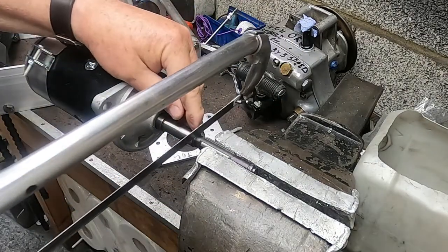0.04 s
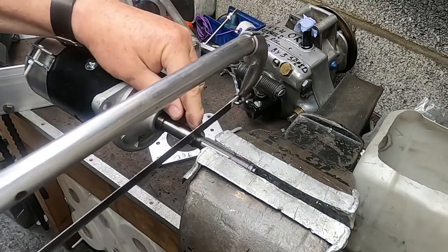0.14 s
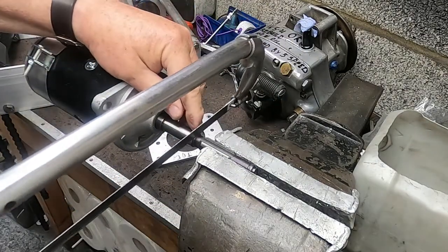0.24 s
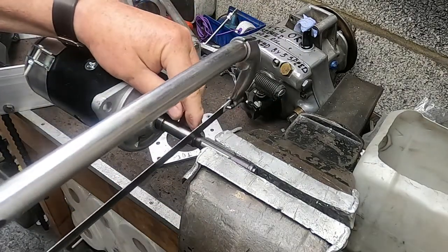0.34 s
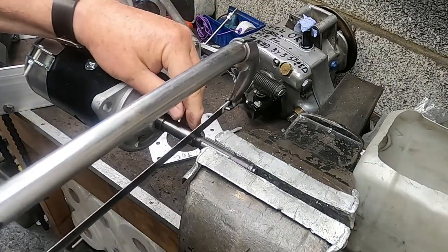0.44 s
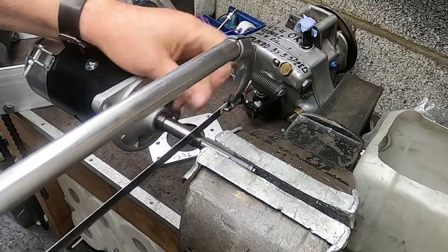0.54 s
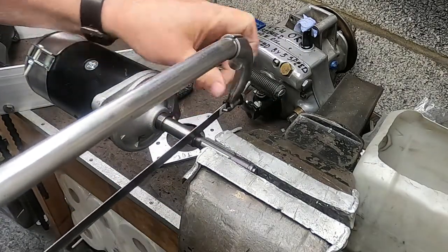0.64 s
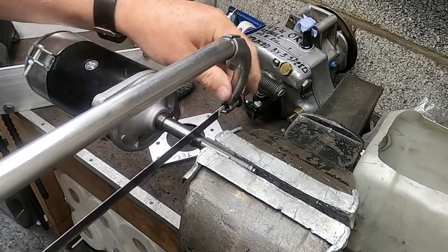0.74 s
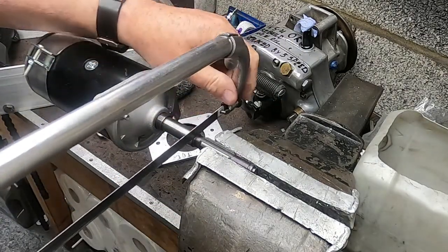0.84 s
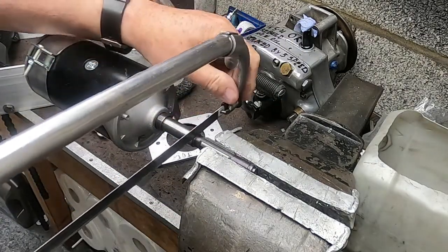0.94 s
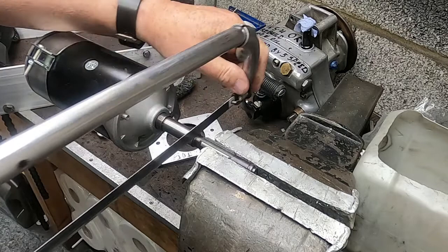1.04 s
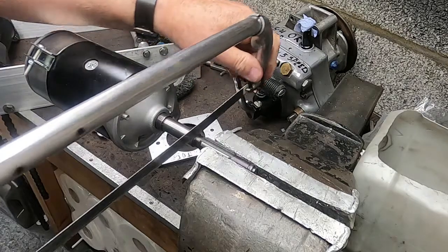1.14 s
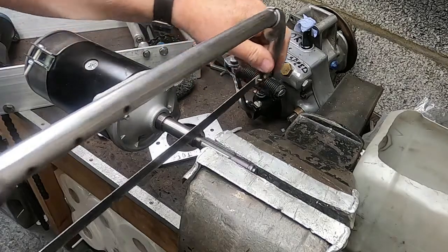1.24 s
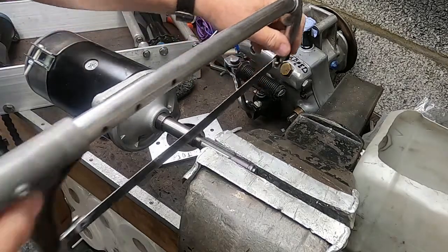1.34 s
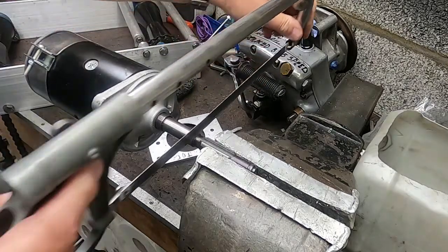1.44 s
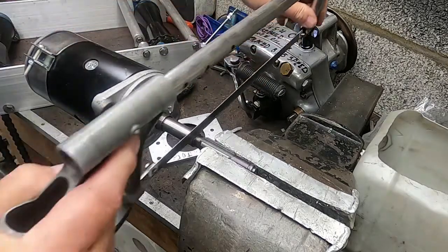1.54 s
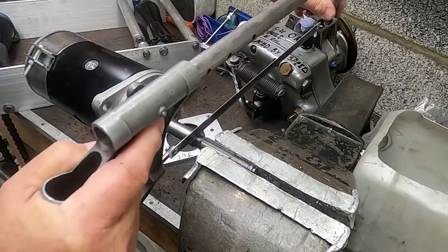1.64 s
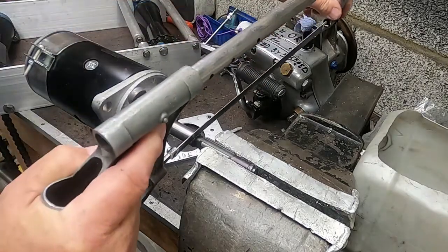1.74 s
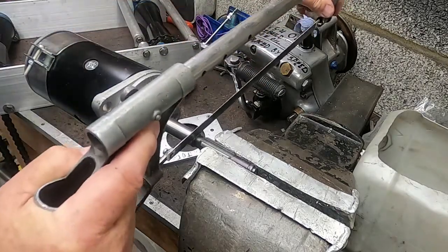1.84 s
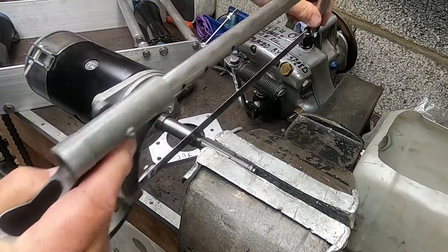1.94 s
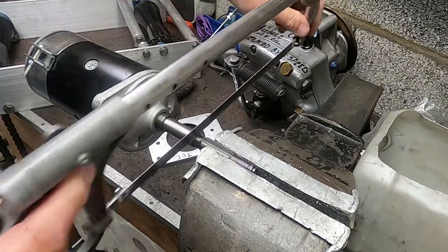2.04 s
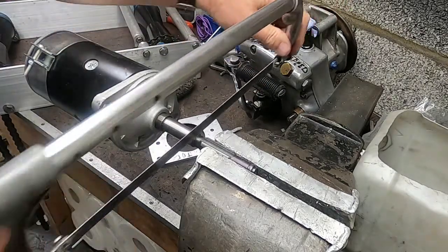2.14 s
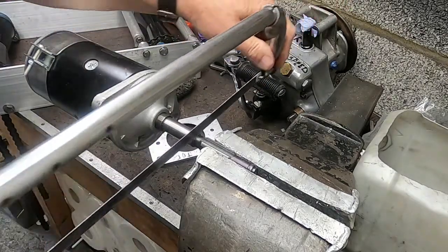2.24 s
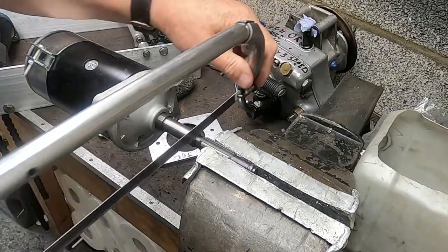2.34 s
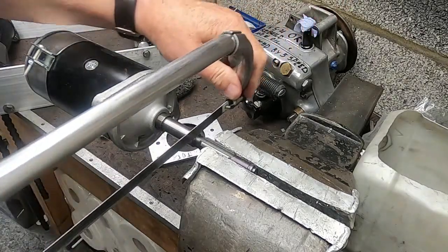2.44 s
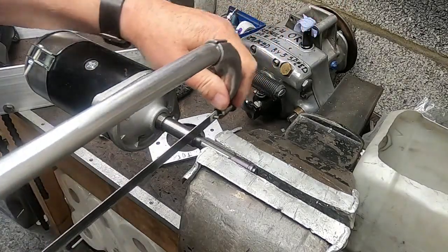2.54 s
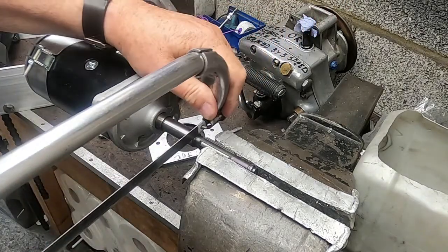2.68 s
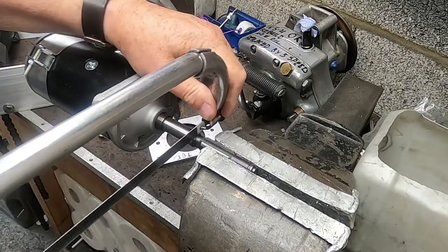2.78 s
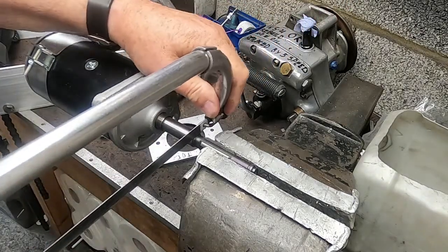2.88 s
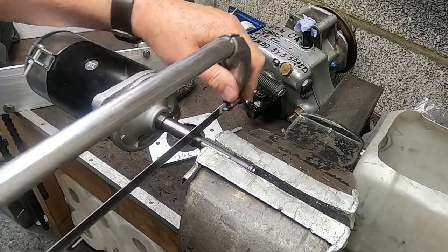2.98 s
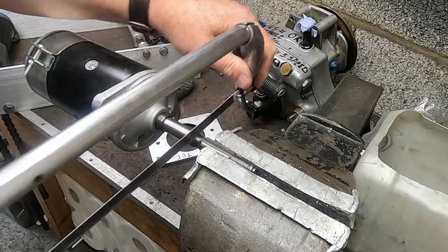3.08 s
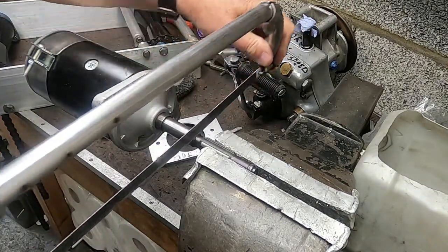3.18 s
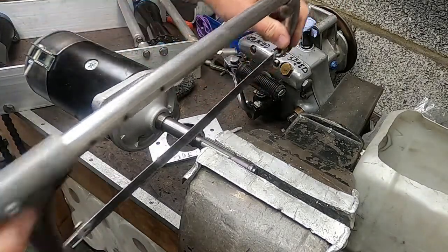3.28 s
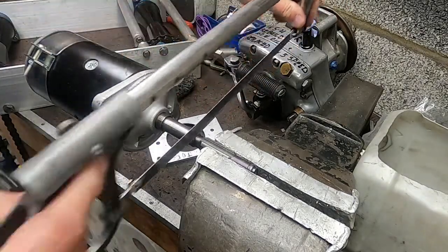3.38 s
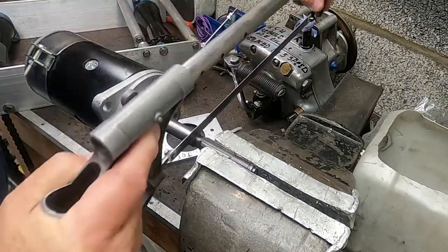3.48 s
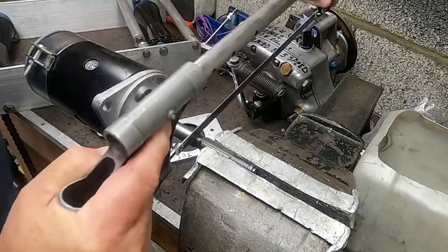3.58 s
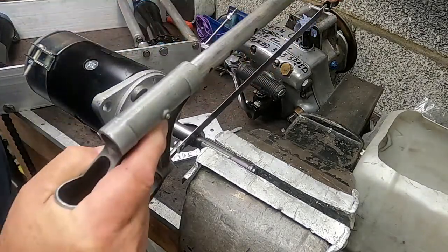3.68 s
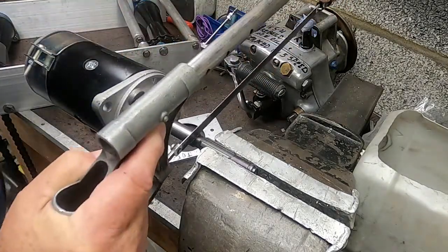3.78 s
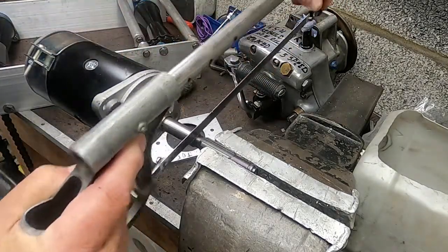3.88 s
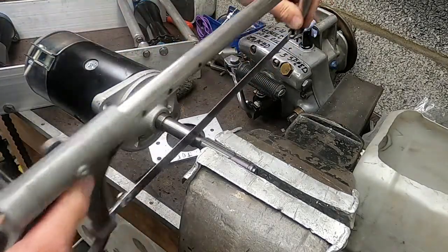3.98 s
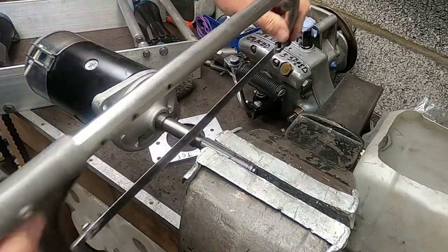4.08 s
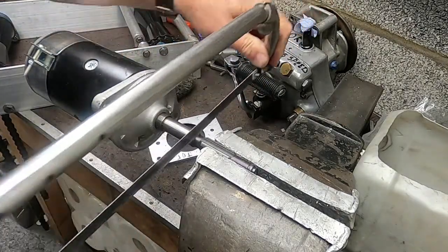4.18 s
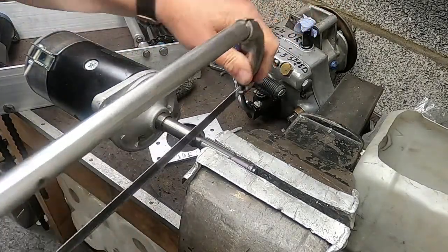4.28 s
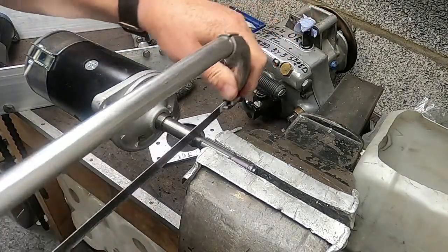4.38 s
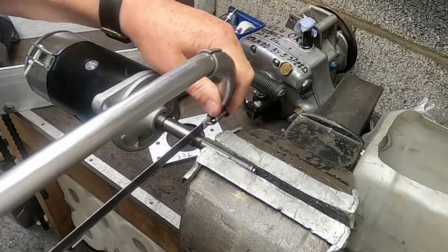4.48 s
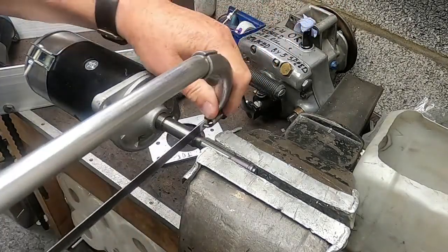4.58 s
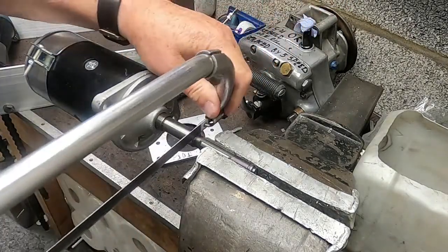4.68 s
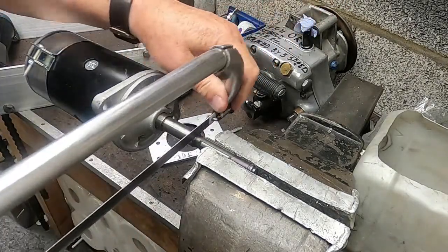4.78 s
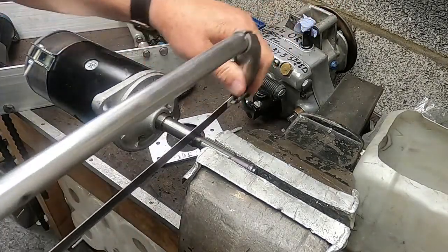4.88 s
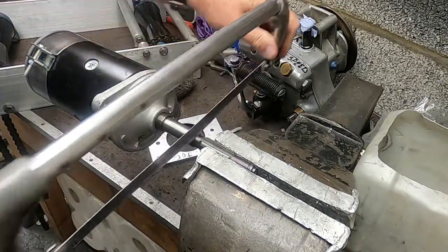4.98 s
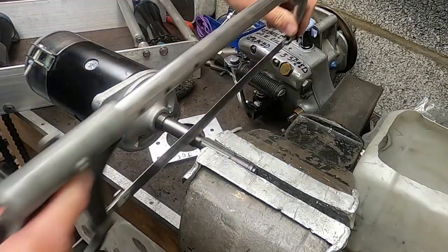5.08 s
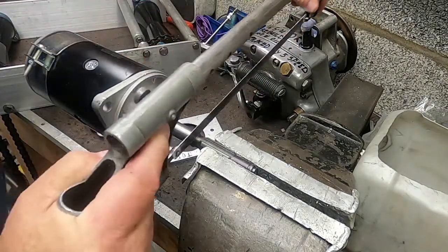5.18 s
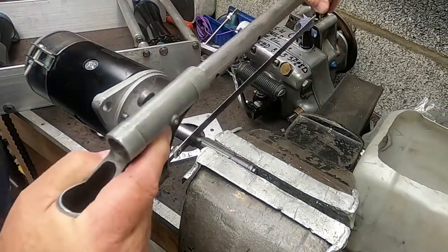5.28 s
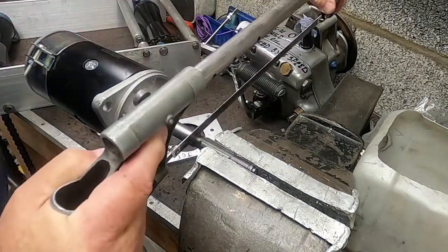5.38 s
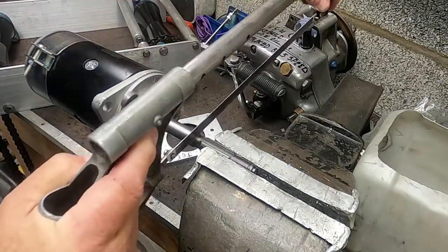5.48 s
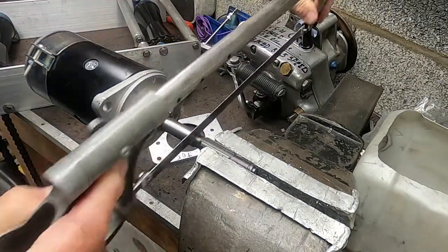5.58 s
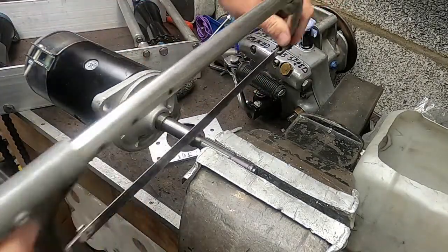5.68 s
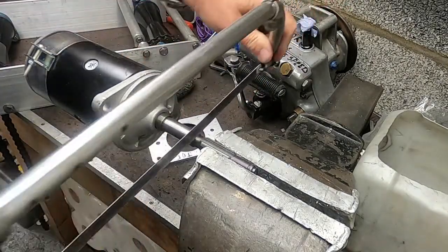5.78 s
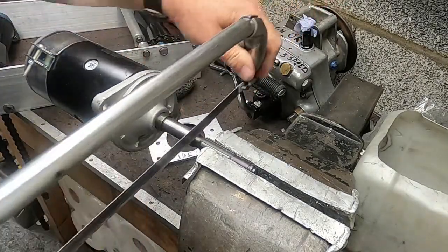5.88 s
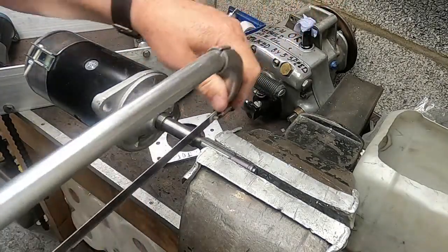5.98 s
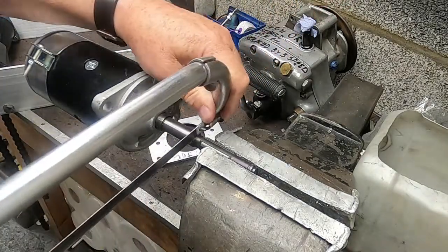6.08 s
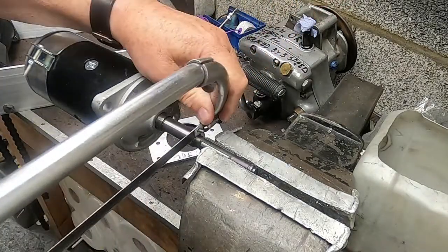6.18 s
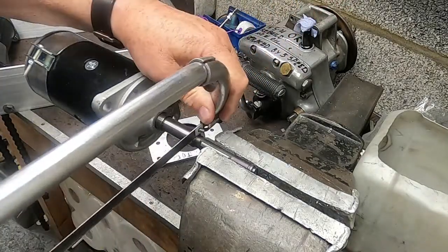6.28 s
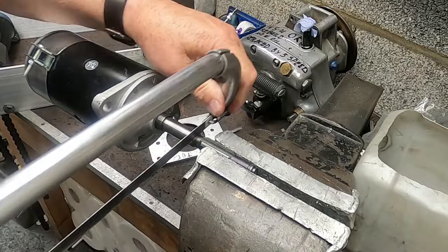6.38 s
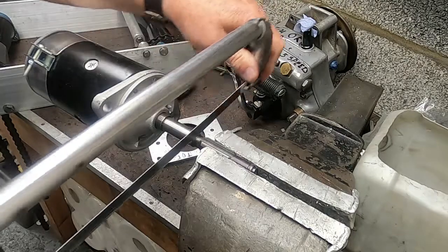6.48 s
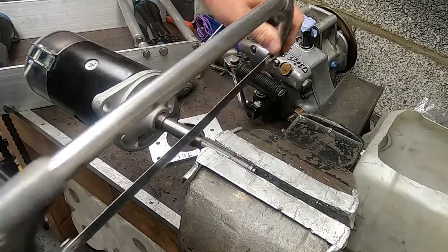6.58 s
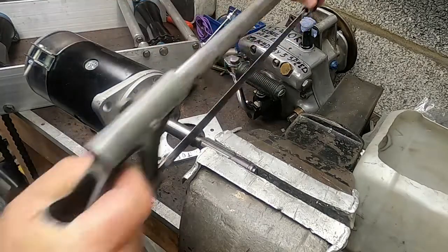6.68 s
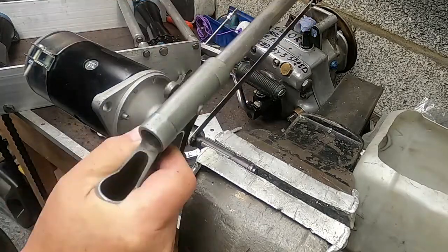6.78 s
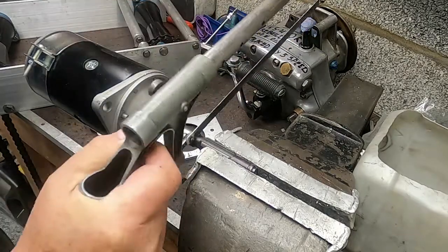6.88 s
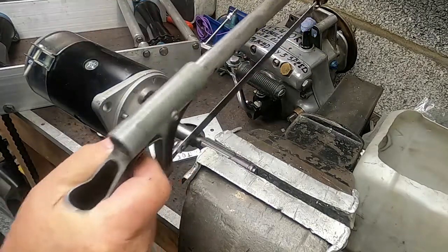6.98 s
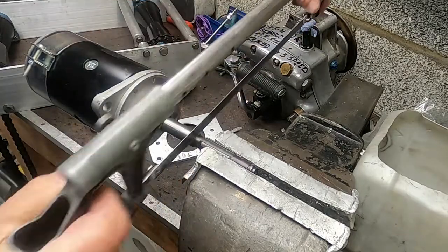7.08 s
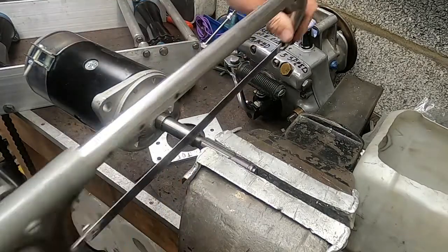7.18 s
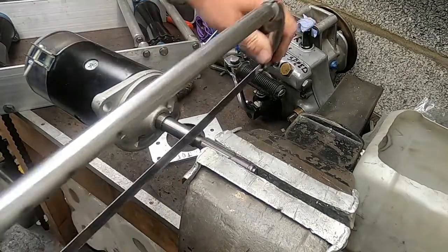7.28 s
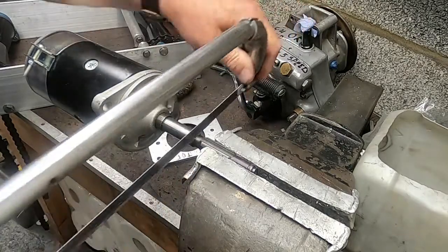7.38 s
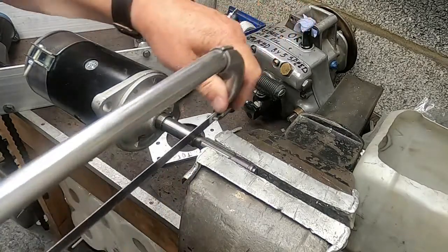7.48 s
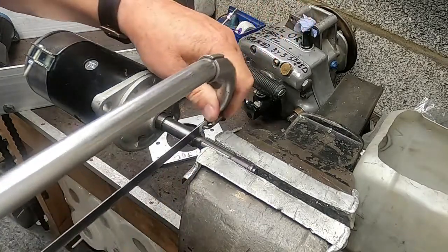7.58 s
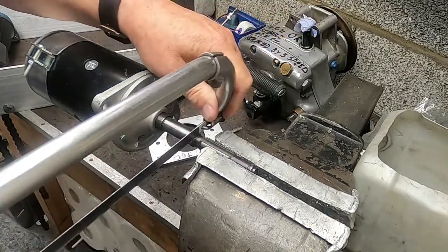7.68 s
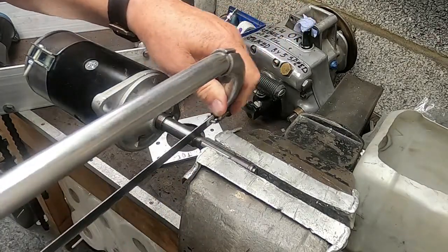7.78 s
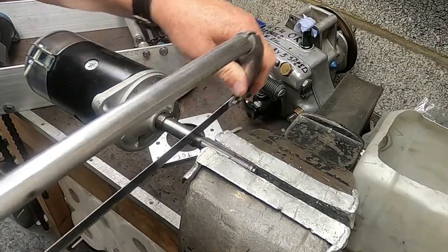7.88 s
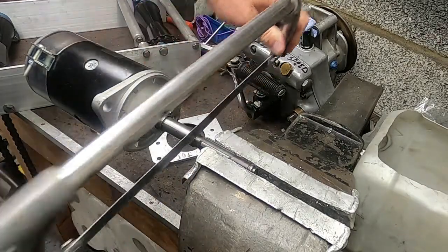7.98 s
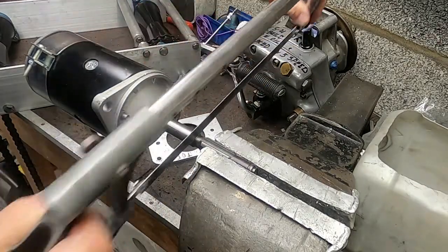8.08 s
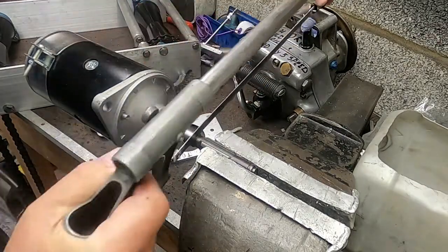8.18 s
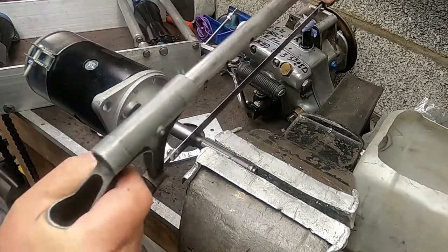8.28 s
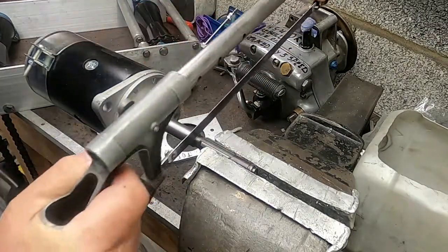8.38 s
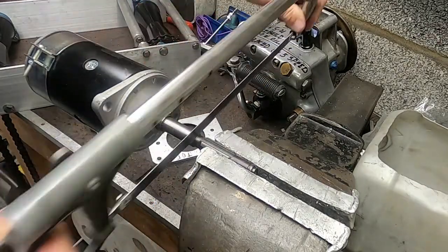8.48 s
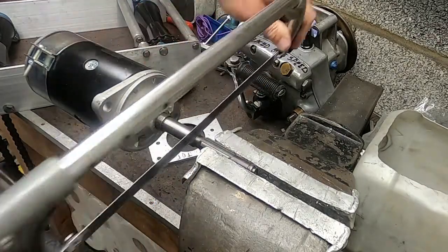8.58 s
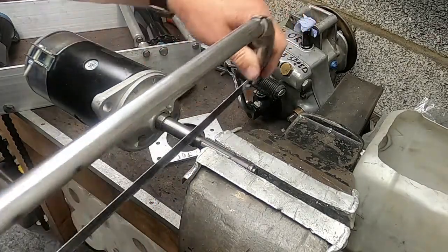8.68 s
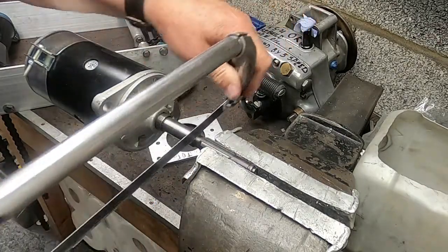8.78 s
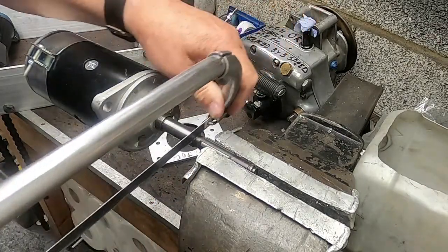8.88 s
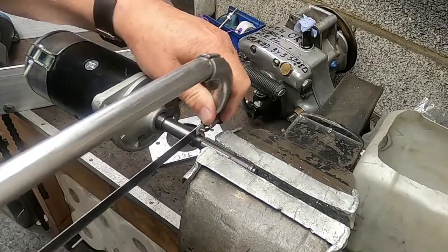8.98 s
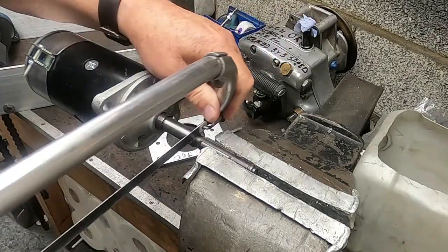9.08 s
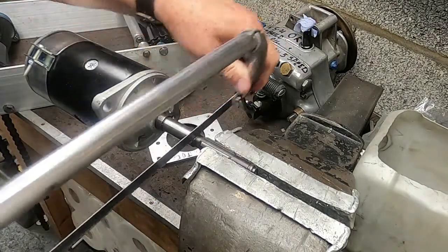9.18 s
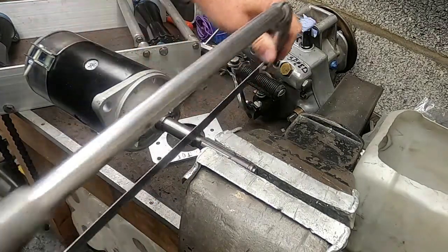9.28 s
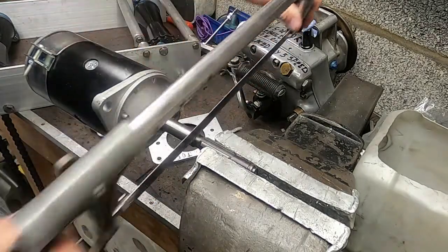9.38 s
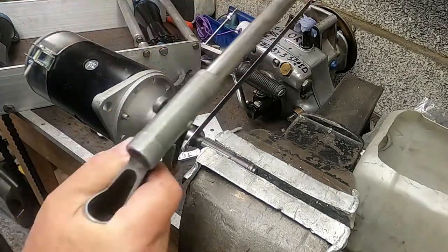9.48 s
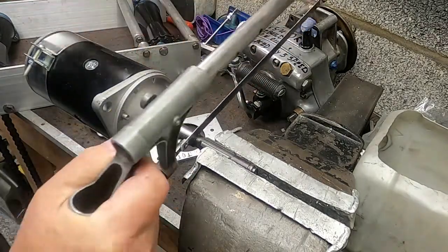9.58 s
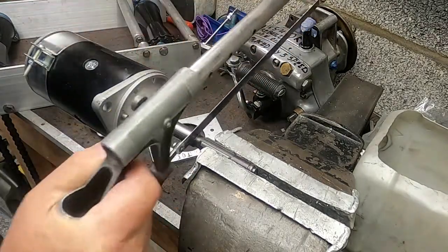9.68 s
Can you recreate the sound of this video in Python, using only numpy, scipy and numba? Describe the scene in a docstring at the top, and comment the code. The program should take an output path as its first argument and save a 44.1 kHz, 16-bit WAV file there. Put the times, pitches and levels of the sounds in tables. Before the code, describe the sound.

Close by in a small workshop, faint metal ticks lead into steady hand sawing through a clamped steel shaft. Each push and pull of the hacksaw makes a gritty, hissing rasp with a metallic ring, over a low grind and the rumble of the workbench. The strokes grow faster and somewhat louder, and the blade increasingly chatters and squeaks, with small crunches and an occasional dull knock as it turns.

```python
"""First come light scuffs and ticks: a hacksaw is set on a steel shaft in a bench vise, close by.
Then eleven rasping strokes cut into it. Teeth and tearing chips make the saw frame and shaft ring.
The free lengths of blade on either side of the cut ring too, one gliding up as the other glides down.
Now and then the blade chatters, sticks and shrieks, or a tooth snags with a crunch.
The bench shudders underneath, and the small workshop adds a short echo."""
import sys
import numpy as np
from scipy import signal
from scipy.fft import rfft, irfft, next_fast_len
from scipy.io import wavfile
from scipy.ndimage import uniform_filter1d, map_coordinates
from numba import njit

SR = 44100
rng = np.random.default_rng(int(sys.argv[2]) if len(sys.argv) > 2 else 0)


def generate_wav(signal):
    """Clip the signal to [-1, 1] and save it as 16-bit WAV at the path in sys.argv[1]."""
    frames = np.transpose(np.atleast_2d(signal))
    scaled = np.clip(frames, -1, 1) * 32767
    pcm = np.round(scaled).astype(np.int16)
    wavfile.write(sys.argv[1], SR, pcm)


N = 429534

# Table levels are relative: each sound sets its own overall gain. A fade is the time to drop 60 dB.
# A resonance is a pitch at which a thing likes to ring; the smaller its width, the longer it rings.
# The blade scuffs the shaft as it is placed or comes to rest: middle_s, length_s, level_db
SCUFFS = [(0.003, .1, -43), (0.143, 0.65, -58), (0.303, 0.14, -58.5), (0.614, 0.081, -64),
          (0.796, 0.071, -66), (3.664, 0.057, -45.5)]
# Single teeth tick on the shaft: start_s, level_db
TICKS = [(.024, -41), (.14, -44.5), (.256, -46), (.288, -48), (.309, -41), (.338, -54), (.4, -55)]
# Resonances of the saw frame under a light touch: pitch_hz, width_hz, level_db
LIGHT_RING = [(762, 26, -5), (1856, 38, 2.5), (2040, 58, 4), (2900, 74, -5.5), (3420, 120, -1),
              (4110, 33, -14), (4300, 45, -4)]
# Tone colour of the rasp: pitch_hz, level_db
RASP_COLOUR = [(500, -8.5), (800, -4.5), (1050, 1), (1600, -1), (2400, 2), (3400, 3), (4800, 3.5),
               (5600, 0.5), (6300, 5.5), (6800, -5.5), (8000, -6.5), (10000, -10.5), (12000, -16),
               (14200, -19.5), (15000, -53.5)]
# Resonances of the saw frame while cutting: pitch_hz, width_hz, level_db
FRAME_RING = [(756, 23, -7.5), (1160, 56, 1.5), (1298, 61, -8), (1416, 75, -4), (2416, 40, -3),
              (2823, 28, 1.5), (3064, 65, -4), (3140, 64, -3), (3274, 80, -7), (3460, 70, -6.5),
              (3938, 35, -3), (4570, 90, -4), (5450, 98, 0)]
# The frame's singing resonance, which shifts with the grip: pitch_hz, width_hz, level_db
FRAME_SINGING = [(1997, 45, 0)]
# Tone colour of the low grind: pitch_hz, level_db
GRIND_COLOUR = [(100, -22), (200, -2.5), (400, 15), (540, -11.5), (720, -1.5), (1300, 10.5), (2000, -2),
                (4000, -58)]
# Resonances of the vise: pitch_hz, width_hz, level_db
VISE_RING = [(206.3, 15, 1), (252.7, 11.6, -2.5), (312, 13.3, -4.5), (424.5, 20.5, -2), (651, 18, -18)]
# Resonances of the slack blade flapping sideways: pitch_hz, width_hz, level_db
BLADE_FLAP = [(266, 14, -9.5), (360, 90, -14.5), (436, 48, -5)]
# The bench's deep sway: time_s, pitch_hz
SWAY_PITCH = [(0, 37.5), (1.05, 39.13), (1.2, 46.44), (6.2, 46.46), (7, 48.78), (9.74, 47.9)]
# Resonances of the bench top: pitch_hz, width_hz, level_db
BENCH_TOP_RING = [(69.1, 6.1, 3.5), (107.3, 16, -1.5), (137.1, 13.7, 2)]
# Tone colour of the still air: pitch_hz, level_db
AIR_COLOUR = [(25, -8.5), (60, 11.5), (150, -22.5), (300, -18.5), (700, -32.5), (2000, -36.5),
              (6000, -36.5), (14000, -52.5)]
# Pushes and pulls in turn, a push first. The saw is half way at halfway_share of the stroke's time;
# bite is how hard the teeth cut, and resting is the blade's drag in the cut afterwards:
# start_s, length_s, halfway_share, rise_s, fall_s, bite_db, thrum_db, sway_db, resting_db
STROKES = [(1.029, .78, 0.44, 0.15, 0.19, -32, -36.5, -32, -77),
           (1.915, 0.94, 0.46, 0.078, 0.46, -29.5, -37, -39.5, -74),
           (2.888, 0.85, .45, 0.24, 0.28, -28, -34.5, -24.5, -75),
           (3.82, 0.88, 0.53, 0.22, 0.4, -26.5, -32.5, -35, -72.5),
           (4.763, 0.59, 0.43, 0.23, 0.2, -23, -32, -27.5, -64.5),
           (5.539, .70, .5, 0.11, 0.25, -25, -34, -31.5, -73),
           (6.35, 0.57, 0.43, 0.2, 0.17, -23, -33.5, -33, -73.5),
           (6.996, 0.744, 0.5, 0.19, 0.28, -25, -33, -35.5, -62),
           (7.787, 0.52, .43, 0.16, 0.16, -23, -30.5, -35.5, -62),
           (8.426, 0.66, 0.47, 0.11, 0.27, -22.5, -37, -36, -82),
           (9.099, .53, 0.42, 0.15, 0.16, -22, -28.5, -24.5, -64),
           (9.699, 0.5, 0.45, 0.13, .25, -24, -22, -35, -72)]
# Resonances of the shaft: pitch_hz, width_hz, level_db
SHAFT_RING = [(4097, 34, -1), (4342, 28, 1)]
# Bending resonances of the longest free length of blade: pitch_hz, width_hz, level_db
BLADE_RING = [(202.2, 36, -3), (431, 60, 5.5), (680, 270, -12), (1248, 130, 3), (2466, 150, -1.5),
              (4120, 180, -4)]
# How well the frame passes on the blade's ring: pitch_hz, level_db
BLADE_CARRY = [(250, -1), (430, -1), (540, -5), (680, 3), (930, 2), (1100, 0), (1400, 1), (2000, -4),
               (2800, 0), (4200, -5), (6000, -8), (7500, -30)]
# Resonances of the blade as it twists and chatters: pitch_hz, width_hz, level_db
CHATTER_RING = [(5440, 290, 3.5), (5860, 180, 1), (6028, 88, 15)]
# The arm leans in during the first, slow strokes: middle_s, length_s, boost_db
SURGES = [(1.4, 0.44, 4), (2.21, 0.44, 3), (3.37, 0.24, 4)]
# Resonances of the blade's side scraping the cut: pitch_hz, width_hz, level_db
SCRAPE_RING = [(5400, 350, 0), (5700, 390, 0)]
# The blade sticks and shrieks on one resonance: middle_s, length_s, pitch_hz, level_db
SHRIEKS = [(1.528, 0.32, 4320, -39), (1.684, 0.074, 2950, -43), (2.276, 0.058, 1994, -31),
           (2.465, 0.12, 1886, -36), (3.044, 0.033, 6470, -35), (3.57, 0.15, 4340, -38),
           (4.262, 0.061, 6220, -28), (5.039, .045, 4100, -27), (6.507, 0.049, 4090, -25),
           (6.552, 0.045, 4140, -28), (6.685, 0.032, 1963, -30), (6.696, 0.03, 5870, -23),
           (6.838, 0.11, 410, -38.5), (7.191, 0.065, 5280, -26), (7.271, 0.084, 6050, -24),
           (7.357, 0.054, 6300, -29), (7.448, 0.035, 1960, -26), (7.493, 0.038, 2067, -27),
           (7.911, 0.048, 6280, -32), (7.929, 0.029, 4110, -21), (7.98, 0.057, 5980, -29),
           (8.08, 0.045, 6150, -30), (8.127, 0.051, 5970, -26), (8.608, 0.075, 6130, -26),
           (8.81, 0.05, 2020, -27), (9.412, 0.04, 6000, -21.5), (9.444, 0.041, 5225, -26.5),
           (9.5, 0.048, 6150, -27.5)]
# A tooth snags and breaks free: start_s, level_db
SNAGS = [(1.4163, -10), (1.5345, -12), (2.2004, -14), (2.2603, -17), (2.4233, -16.5), (2.4798, -23),
         (3.0465, -18.5), (3.3372, -10), (3.381, -15), (4.135, -13), (5.0325, -13), (5.7796, -10.5),
         (5.9948, -12.5), (6.0242, -11), (6.555, -15), (6.5859, -13.5), (6.6073, -15), (6.651, -12),
         (7.5234, -17), (7.9244, -13.5), (8.0247, -20), (8.0691, -11.5), (9.4025, -18), (9.4424, -14)]
# The saw knocks as it turns round: start_s, level_db
KNOCKS = [(1.789, -27), (5.317, -32.5), (5.489, -39.5)]
# Tone colour of a knock: pitch_hz, level_db
KNOCK_COLOUR = [(60, 4), (150, 22), (500, 10), (1000, 7), (2200, 2.5), (2900, -13), (8000, -20.5),
                (14000, -44.5)]
# The teeth drop into the cut and bite at once: start_s, level_db
CATCHES = [(1.9525, -29.5), (3.837, -43), (4.783, -44), (5.5445, -32), (6.375, -43), (6.9955, -43),
           (7.047, -31), (7.802, -44), (8.431, -33), (9.111, -41), (9.127, -35), (9.723, -33)]
# Stereo width, as the side signal's level against the middle: pitch_hz, level_db
STEREO_WIDTH = [(40, -28), (125, -26), (350, -20), (1200, -13), (3000, -7.5), (6000, -5), (9000, 1)]
# How long the workshop echoes: pitch_hz, fade_s
ROOM_FADE = [(100, 0.06), (500, 0.26), (1400, 0.34), (2300, 0.22), (3200, 0.17), (10000, 0.099)]

TIME_S = np.arange(N) / SR


def amp(db):
    """Turn decibels into a gain."""
    return 10 ** (np.asarray(db) / 20)


def unit(x):
    """Scale to an average (rms) level of 1."""
    return x / np.sqrt(np.mean(x ** 2) + 1e-20)


def along(points, hz):
    """Read between the rows of a (pitch_hz, value) table, on a log pitch scale."""
    pitches, values = np.transpose(points)
    return np.interp(np.log(hz + 1), np.log(pitches + 1), values)


def ease(x):
    """Rise from 0 to 1 along a quarter sine."""
    return np.sin(np.pi / 2 * np.clip(x, 0, 1))


def arch(x, middle, width):
    """A smooth hump of height 1."""
    return ease(1 - 2 * np.abs(x - middle) / width)


def wobble(rate):
    """A smooth curve through `rate` random values a second."""
    return map_coordinates(rng.standard_normal(int(N * rate / SR) + 4), [TIME_S * rate])


def flares(depth_db=2.8, rate=30):
    """A gain that flares and fades at random."""
    return unit(amp(depth_db * wobble(rate)))


def bursts(rows, fade_s):
    """A short, fading burst of noise for each (start_s, level_db) row."""
    force, t = np.zeros(N + SR), np.arange(SR // 20) / SR
    for start_s, db in rows:
        force[round(start_s * SR):][:len(t)] += amp(db - 60 * t / fade_s) * rng.standard_normal(len(t))
    return force[:N]


def filtered(x, response):
    """Multiply each frequency in x by response(hz)."""
    size = next_fast_len(N + SR // 2, True)
    return irfft(rfft(x, size) * response(np.fft.rfftfreq(size, 1 / SR)), size)[..., :N]


def through(x, pulse):
    """Let every sample of x set off a pulse, scaled to an energy of 1."""
    return signal.oaconvolve(x, pulse / np.linalg.norm(pulse))[:len(x)]


def coloured(x, colour, size=2048):
    """Give x the tone colour in a table."""
    cepstrum = irfft(np.log(amp(along(colour, np.fft.rfftfreq(size, 1 / SR)))))
    # fold it in half, so the filter never sounds ahead of its input
    cepstrum[1:size // 2] *= 2
    cepstrum[size // 2 + 1:] = 0
    return through(x, irfft(np.exp(rfft(cepstrum))))


def rung(x, resonances, cutoff_hz=7500):
    """Let x ring steady resonances, with the top treble softened."""
    t = np.arange(SR // 4) / SR
    pulse = sum((-1) ** k * amp(db) * width * np.exp(-np.pi * width * t) * np.cos(2 * np.pi * hz * t)
                for k, (hz, width, db) in enumerate(resonances))
    return through(x, signal.sosfilt(signal.butter(2, cutoff_hz, fs=SR, output="sos"), pulse))


@njit
def gliding(x, pitch_hz, width_hz):
    """Let x ring one resonance whose pitch moves."""
    turn, loss = 2 * np.pi * pitch_hz / SR, np.pi * width_hz / SR
    ring, state = np.zeros(len(x)), 0j
    for i in range(len(x)):
        state = state * (1 - loss) * complex(np.cos(turn[i]), np.sin(turn[i])) + x[i]
        ring[i] = state.real * loss
    return ring


def drifting(x, resonances, stretch):
    """Let x ring resonances whose pitches are all multiplied by one moving stretch."""
    ring = sum(amp(db) * gliding(x, hz * stretch, width) for hz, width, db in resonances)
    energy = sum(amp(db) ** 2 * np.pi * width / SR for _, width, db in resonances)
    return 2 * ring / np.sqrt(energy)


def patchy(x, depth_db, even_above_hz=7000):
    """Make the tone colour flicker in brief patches; the top treble stays even."""
    hz, _, spectrum = signal.stft(x, SR, nperseg=256)
    patches = rng.standard_normal(spectrum.shape)
    for _ in range(2):
        patches = uniform_filter1d(uniform_filter1d(patches, size=3, axis=0), size=9, axis=1)
    gain = amp(depth_db * unit(patches) / (1 + (hz[:, None] / even_above_hz) ** 8))
    return signal.istft(spectrum * unit(gain), nperseg=256)[1][:N]


def moving(stroke, rise_s, fall_s):
    """A gain that opens as a stroke starts and closes as it ends."""
    return (ease(stroke["age_s"] / rise_s) * ease(stroke["left_s"] / fall_s)) ** 2


def light_touches(grit_db=2.5):
    """How strongly the blade scuffs and ticks on the shaft as it is placed or comes to rest."""
    scuffs = sum(amp(db) * arch(TIME_S, middle_s, length_s) for middle_s, length_s, db in SCUFFS)
    return amp(grit_db * wobble(109.5)) * scuffs + np.abs(bursts(TICKS, fade_s=0.023))


def teeth(position, tooth_count=190, chips_per_s=3600):
    """The force at the cut: passing teeth tear off chips, over a steady scrape."""
    passing = 1 + 0.2 * np.cos(2 * np.pi * tooth_count * position)
    chips = (rng.random(N) < chips_per_s / SR) * rng.choice([-1, 1], N)
    chip_sizes = amp(1.5 * np.minimum(rng.exponential(size=N), 4))
    force = unit(chips * chip_sizes) + rng.standard_normal(N)
    judder = amp(1.61 * wobble(260) + 1.15 * wobble(45))
    return unit(force * passing * judder)


def rasp(bite, crunches, position, frame_share=.2, twist_share=.25):
    """The teeth's hiss, streaked by many weak resonances: steady in the frame, gliding in the blade."""
    def ringing(x, fade_s):
        """Ring x through a fading noise, which acts as a crowd of resonances."""
        t = np.arange(SR // 12) / SR
        return through(x, rng.standard_normal(len(t)) * amp(-60 * t / fade_s))
    # stretch, ring, then squeeze back: the twisting blade rings higher as it gets shorter
    clock = np.cumsum(1 + .8 * np.clip(position, 0, 1))
    slowed = map_coordinates(bite, [np.interp(np.arange(clock[-1]), clock, np.arange(N))])
    twisting = np.sqrt(twist_share) * map_coordinates(ringing(slowed, fade_s=.03), [clock])
    steady = np.sqrt(frame_share) * ringing(bite, fade_s=.06)
    direct = np.sqrt(1 - frame_share - twist_share) * bite
    hiss = coloured(direct + steady + twisting + amp(5) * crunches, RASP_COLOUR)
    return amp(-5.5) * patchy(hiss, depth_db=3)


def frame_ring(touch_force, bite, crunches, push):
    """The frame rings freely at a light touch, rings under the teeth, and sings more on the pull."""
    light = amp(-3.5) * rung(touch_force, LIGHT_RING)
    cutting = amp(-11) * rung(patchy(bite + amp(13.5) * crunches, depth_db=2), FRAME_RING)
    singing = drifting(bite * flares(), FRAME_SINGING, stretch=1 + 0.029 * wobble(14))
    return light + cutting + amp(-13.75 - 1.5 * push) * singing


def low_grind(force, stroke, touch):
    """The cut grinds and rings the vise; late in a pull the blade goes slack and groans instead."""
    # the long free length of blade overhangs early in a push and late in a pull
    overhang = arch(stroke["share"], np.where(stroke["pushing"], 0.16, 0.768), 0.44)
    effort_db, push = stroke["effort_db"], stroke["push"]
    level_db = -44.5 + 0.13 * effort_db + (8.5 + .8 * effort_db) * overhang + 2.65 * wobble(21)
    gain = amp(level_db) * moving(stroke, rise_s=0.12, fall_s=0.13)
    gain += amp(8) * stroke["resting"] + amp(-22) * touch
    load = force * gain * amp(-2.5 * overhang * push)
    slack = overhang * (1 - push)
    grind = amp(-4) * coloured(load * (1 - slack) ** 2, GRIND_COLOUR)
    groan = amp(-2) * rung(load * slack, BLADE_FLAP)
    return grind + amp(1) * rung(load, VISE_RING) + groan


def bench_sway(stroke, rumble_hz=55):
    """The bench sways at its lowest resonance, most in mid stroke, with a loose rumble."""
    idle = uniform_filter1d(amp(np.where(stroke["age_s"] > 0, -37, -31)), SR // 4)  # more while placing
    gain = np.hypot(idle, amp(stroke["sway_db"]) * arch(stroke["share"], 0.58, 1.06))
    pitch_hz = np.interp(TIME_S, *np.transpose(SWAY_PITCH)) + 1.36 * wobble(11)
    sway = np.sqrt(2) * np.sin(2 * np.pi * np.cumsum(pitch_hz) / SR) * amp(-1 + 3.34 * wobble(16))
    rumble = unit(filtered(rng.standard_normal(N), lambda hz: (hz > 20) / (1 + (hz / rumble_hz) ** 6)))
    return uniform_filter1d(gain, SR // 25) * (sway + amp(-5.5) * rumble)


def bench_thrum(stroke, touch, cutoff_hz=165):
    """The bench top thrums, most near the saw's turns; light touches stir it too."""
    push_tilt_db = -5 * (stroke["position"] - .5) * stroke["pushing"]
    middle_dip_db = -4.5 * np.sin(np.pi * stroke["position"])
    driven = amp(stroke["thrum_db"] + push_tilt_db + middle_dip_db)
    gain = driven * moving(stroke, rise_s=0.082, fall_s=0.16) + amp(-48) + amp(-4) * touch
    ring = rung(rng.standard_normal(N), BENCH_TOP_RING)
    thrum = unit(filtered(ring, lambda hz: 1 / (1 + (hz / cutoff_hz) ** 6)))
    return uniform_filter1d(gain, SR // 25) * thrum


def still_air():
    """The room's faint, low hush."""
    return amp(-54) * unit(filtered(rng.standard_normal(N), lambda hz: amp(along(AIR_COLOUR, hz))))


def arm_strokes(first_place=.15, drawn_back=0.03536, pushed_home=0.99, usual_bite_db=-23):
    """The arm pushes and pulls: the saw's timing, position (0 back, 1 forward) and levels over time."""
    rows = np.array(STROKES)
    index = np.maximum(np.searchsorted(rows[:, 0], TIME_S) - 1, 0)
    start_s, length_s, halfway, rise_s, fall_s, bite_db, thrum_db, sway_db, _ = rows.T[:, index]
    pushing, age_s = index % 2 == 0, TIME_S - start_s
    share, left_s = age_s / length_s, length_s - age_s
    travel_share = np.where(pushing, .85, 0.93)  # part of the stroke spent moving
    travelled = ease(.5 + (share - halfway) / travel_share) ** 2
    back = np.where(index == 0, first_place, drawn_back)
    position = back + (pushed_home - back) * np.where(pushing, travelled, 1 - travelled)
    rise = ease(age_s / rise_s) ** np.where(pushing, 1.48, 0.96)
    first_grip = amp(-23.5) * ease(age_s / 0.017)  # the teeth catch lightly right away
    swell = np.hypot(rise, first_grip) * ease(left_s / fall_s) ** 3.62
    resting = amp(np.interp(TIME_S, rows[:, 0] + rows[:, 1], rows[:, -1]))
    surge_db = sum(db * arch(TIME_S, middle, length) for middle, length, db in SURGES)
    push = uniform_filter1d(1. * pushing, SR // 12)  # slides between 0 (pull) and 1 (push)
    return dict(age_s=age_s, left_s=left_s, share=share, pushing=pushing, push=push, position=position,
                swell=swell, resting=resting, bite_db=bite_db, effort_db=bite_db - usual_bite_db,
                surge_db=surge_db, thrum_db=thrum_db, sway_db=sway_db)


def tooth_pressure(stroke, touch, unsteady_db=0.43):
    """How hard the teeth bear on the steel; the blade creeps as the arm takes up each stroke."""
    creep = amp(-60) * sum(arch(TIME_S, row[0] - 0.0065, 0.044) for row in STROKES)
    cutting = amp(stroke["bite_db"] + stroke["surge_db"] + unsteady_db * wobble(24)) * stroke["swell"]
    return cutting + stroke["resting"] + creep + amp(-0.5) * touch


def shaft_ring(bite, stroke):
    """The teeth ring the shaft, harder on the push."""
    return amp(-14.5 + 4.5 * stroke["push"]) * rung(bite * np.sqrt(stroke["swell"]), SHAFT_RING)


def blade_ring(force, stroke, shortest_share=.37):
    """The cut splits the blade into two ringing lengths; the shorter one gets, the higher it rings."""
    position, push = stroke["position"], stroke["push"]
    drive = force * amp(-38.7 + 1.2 * stroke["effort_db"] + 4 * push) * stroke["swell"] ** 0.75
    ring = np.zeros(N)
    for travelled, longest, side_db in ((position, 1, 0), (1 - position, .84, -7 - 5 * push)):
        length = longest * (1 - (1 - shortest_share) * np.clip(travelled, 0, 1))
        length *= 1 + .012 * wobble(60)  # the blade wanders in the cut
        for hz, width, db in BLADE_RING:
            pitch_hz = np.minimum(hz / length ** 2, SR / 2)
            strength = amp(db + side_db + along(BLADE_CARRY, pitch_hz)) * length ** 1.8
            ring += strength * gliding(drive * flares(), pitch_hz, width)
    return unit(ring) * np.std(drive)


def squeals(stroke, whine_hz=1283, wander_hz=50, rough_db=3):
    """Rough tones from the blade: a whine as each push sets off, and shrieks where it sticks."""
    drift = 2 * np.pi * np.cumsum(wander_hz * wobble(300)) / SR
    whine = stroke["pushing"] * amp(-46 + stroke["effort_db"]) * arch(stroke["share"], 0.11, 0.26)
    tones = whine * np.sin(2 * np.pi * whine_hz * TIME_S + drift)
    for middle_s, length_s, hz, db in SHRIEKS:
        on = np.abs(TIME_S - middle_s) < length_s / 2
        tone = np.sqrt(2) * np.sin(2 * np.pi * hz * TIME_S[on] + drift[on])
        tones[on] += amp(db) * arch(TIME_S[on], middle_s, length_s) * tone
    return amp(rough_db * wobble(180)) * tones


def blade_chatter(stroke, crunches):
    """The blade twists and chatters in fits, its pitch sagging as the saw goes forward."""
    level_db = stroke["bite_db"] - 2 + 0.34 * stroke["effort_db"] + .3 * stroke["surge_db"]
    gain = amp(level_db + wobble(28)) * stroke["swell"] ** 2.3
    fits = unit(teeth(stroke["position"]) * amp(3 * wobble(110)))
    stretch = 1 + 0.034 * (.5 - stroke["position"]) + 0.0076 * wobble(25)
    return amp(-1.5) * drifting(fits * gain + amp(1) * crunches, CHATTER_RING, stretch)


def side_scrape(load, stroke):
    """When the arm leans in, the extra load scrapes the blade's side against the cut."""
    return rung(load * (1 - amp(-stroke["surge_db"])), SCRAPE_RING)


def tooth_snags(low_hz=2600, high_hz=8500):
    """A tooth that breaks free gives a short, bright crunch."""
    def band(hz):
        """Keep the middle treble."""
        return (1j * hz / (1j * hz + low_hz)) ** 2 / np.sqrt(1 + (hz / high_hz) ** 4)
    return amp(-2.5) * filtered(bursts(SNAGS, fade_s=0.013), band)


def turn_knocks():
    """The saw gives a dull knock at a few of its turns."""
    return amp(-10) * coloured(bursts(KNOCKS, fade_s=0.16), KNOCK_COLOUR)


def tooth_catches(fade_s=.1):
    """Sudden extra pressure as the teeth drop into the cut."""
    return sum(amp(db - 60 * np.abs(TIME_S - start_s) / fade_s) * (TIME_S >= start_s)
               for start_s, db in CATCHES)


def hacksaw(stroke, touch):
    """All the sounds of the saw, most of them driven by the one force at the cut."""
    position = stroke["position"]
    force, crunches = teeth(position), tooth_snags()
    pressure = tooth_pressure(stroke, touch)
    bite = force * np.hypot(pressure, tooth_catches())
    cut = rasp(bite, crunches, position) + low_grind(force, stroke, touch)
    ring = frame_ring(force * touch, bite, crunches, stroke["push"])
    ring += shaft_ring(bite, stroke) + blade_ring(force, stroke)
    sizzle = blade_chatter(stroke, crunches) + side_scrape(force * pressure, stroke)
    # keep mostly 2500 to 7200 Hz
    sizzle = filtered(sizzle, lambda hz: hz ** 2 / (hz ** 2 + 2500 ** 2) / (1 + (hz / 7200) ** 10))
    return cut + ring + sizzle + squeals(stroke) + turn_knocks()


def bench_reflections(x, position, fade_s=0.024, turns=3):
    """Sound bouncing off the bench reaches each ear differently, and shifts as the saw travels."""
    t = np.arange(SR // 30) / SR
    scatter = rng.standard_normal((2, len(t))) * amp(-60 * t / fade_s)
    first, second = signal.oaconvolve(x[None], scatter / np.linalg.norm(scatter[0]), axes=1)[:, :N]
    angle = 2 * np.pi * turns * position
    blend = first * np.cos(angle) + second * np.sin(angle)
    side = filtered(blend, lambda hz: amp(along(STEREO_WIDTH, hz)))
    return np.array([x + side, x - side])


def workshop_echo(x):
    """The room's echo: each pitch dies away at its own speed."""
    hz, t, noise = signal.stft(rng.standard_normal((2, SR // 2)), SR, nperseg=256)
    tail = signal.istft(noise * amp(-60 * t / along(ROOM_FADE, hz)[:, None]), SR, nperseg=256)[1]
    return signal.fftconvolve(x[None], tail / np.linalg.norm(tail[0]), axes=1)[:, :N]


def scene():
    """The saw and bench in the room, over still air, in stereo."""
    touch, stroke = light_touches(), arm_strokes()
    saw = hacksaw(stroke, touch)
    nearby = saw + bench_sway(stroke) + bench_thrum(stroke, touch) + still_air()
    return bench_reflections(nearby, stroke["position"]) + amp(-12.5) * workshop_echo(saw)


def record(dry, treble_hz=12000, top_hz=14700):
    """The microphone dulls the high treble and keeps nothing above top_hz."""
    return filtered(dry, lambda hz: (hz < top_hz) / np.sqrt(1 + (hz / treble_hz) ** 8))


dry = scene()
out = record(dry)
generate_wav(out)
```